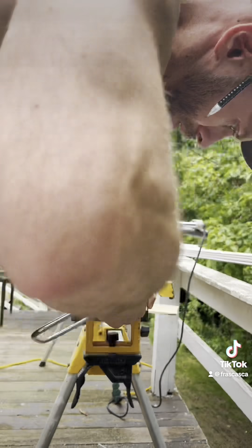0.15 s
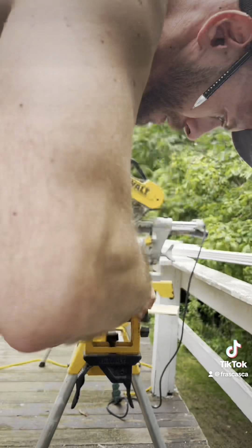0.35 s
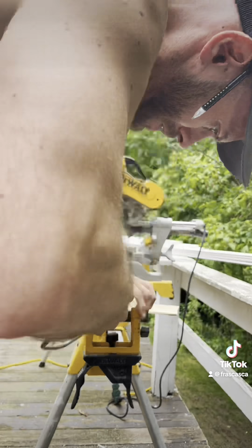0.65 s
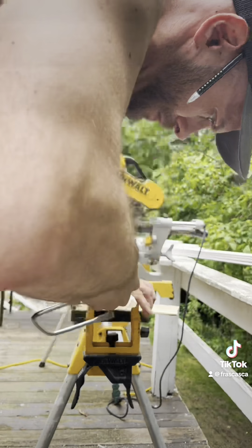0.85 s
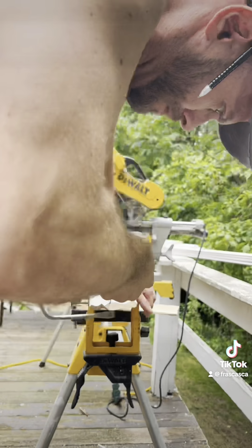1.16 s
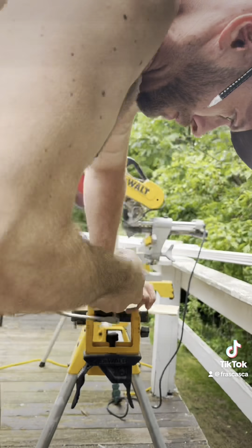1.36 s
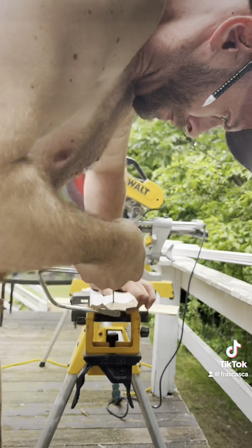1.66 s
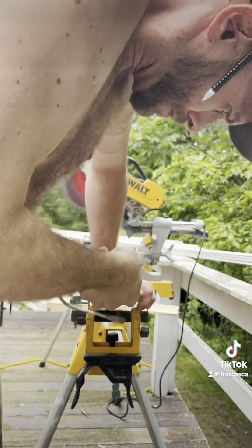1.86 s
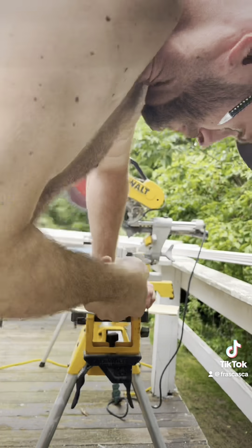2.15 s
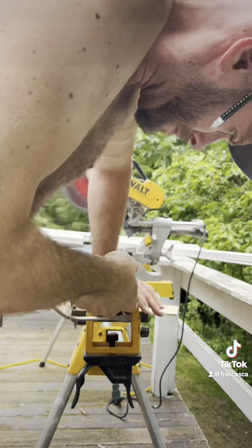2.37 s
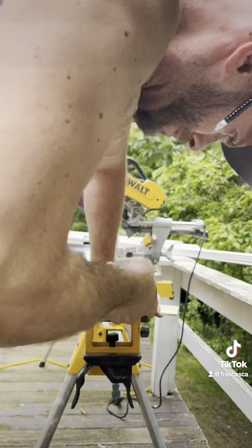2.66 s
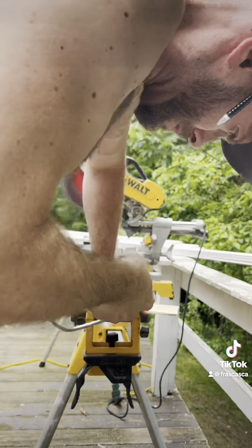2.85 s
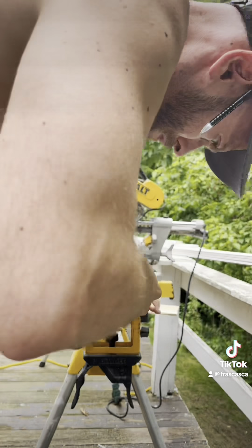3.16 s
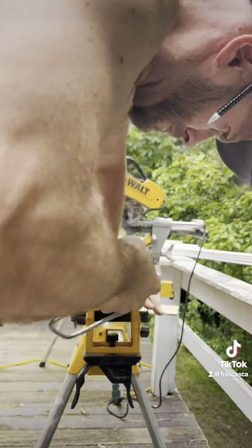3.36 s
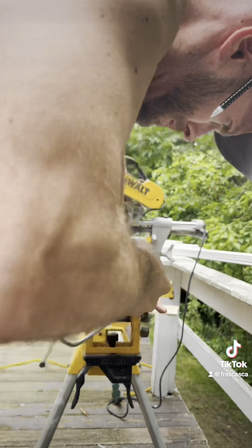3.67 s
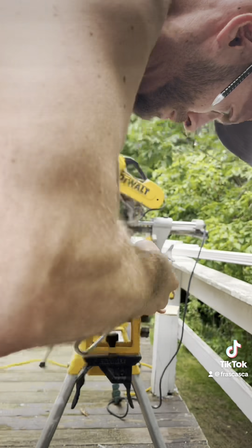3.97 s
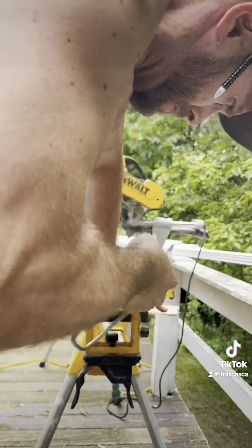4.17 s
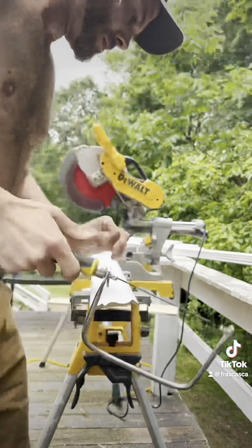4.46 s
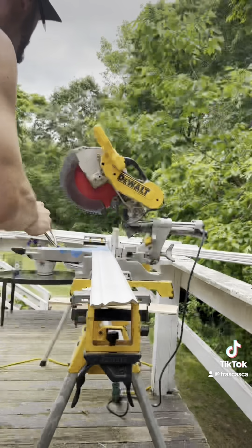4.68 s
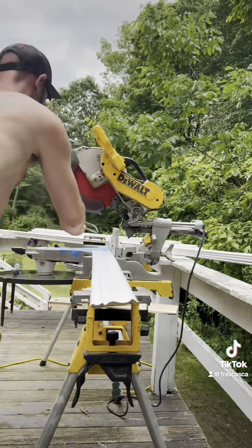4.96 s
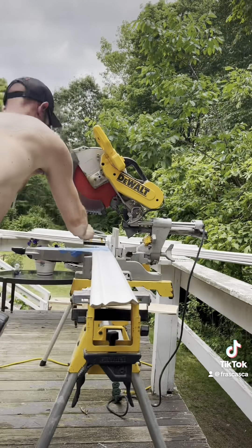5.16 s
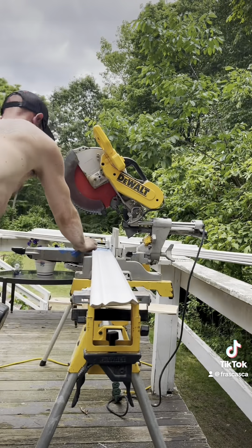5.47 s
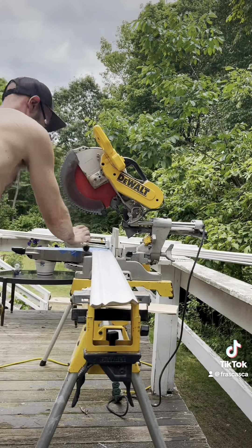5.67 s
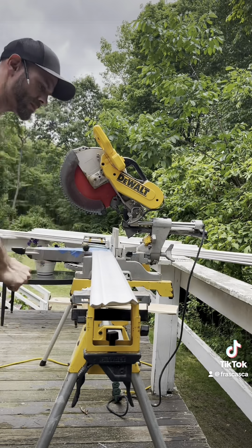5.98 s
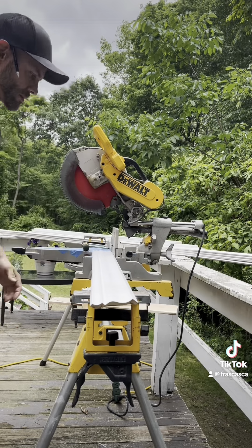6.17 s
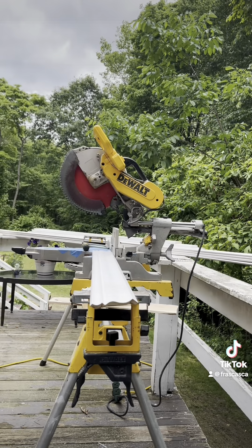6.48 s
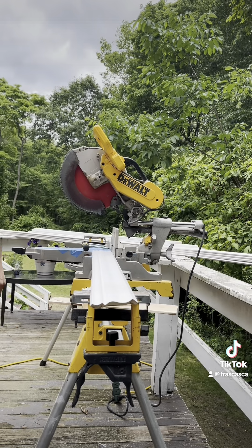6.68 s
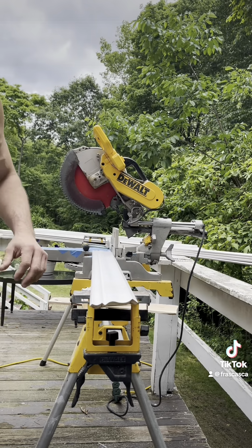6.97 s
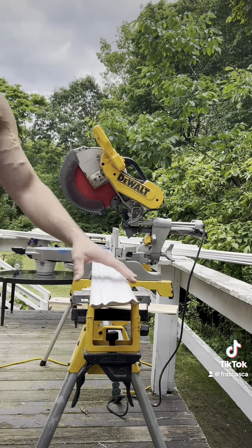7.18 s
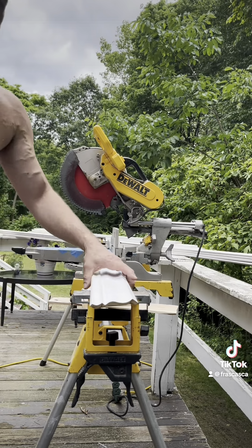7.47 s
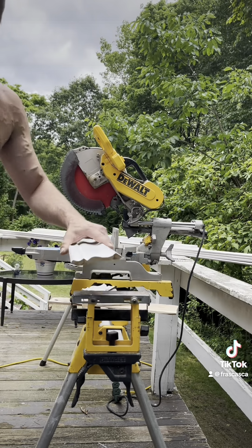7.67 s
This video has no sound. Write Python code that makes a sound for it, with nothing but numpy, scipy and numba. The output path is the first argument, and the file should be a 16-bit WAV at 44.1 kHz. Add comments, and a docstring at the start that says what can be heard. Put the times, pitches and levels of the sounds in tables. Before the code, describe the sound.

Very quick back-and-forth sawing fills the first half: dry, woody rasps at about fifteen strokes a second, squealing slightly midway, faltering, then returning louder. After it ends, deck planks boom and knock under steps, a steel-framed saw drops and rattles, and hands brush the stand. Quiet far rumble and leaf rustle remain, with buzzy birdsong rising at the end. Near microphone outdoors, wide stereo, little echo.

```python
"""A coping saw rasps in very quick strokes through a molding clamped on a steel stand on a wooden deck.
Its teeth are dense random clicks that ring the wood, the stand and the blade; some snag, some squeal.
The worker drops the saw (a bouncing rattle) and steps back over boards that knock, boom and tremble.
Birds whistle and trill in the trees around, over coloured noise for far traffic, wind and rustling.
All is heard close by, in two channels; railing and house wall give short reflections."""
import sys
import numpy as np
from scipy import signal
from scipy.fft import rfft, irfft, next_fast_len
from scipy.io import wavfile
from scipy.ndimage import uniform_filter1d
from numba import njit

SR = 44100
rng = np.random.default_rng(int(sys.argv[2]) if len(sys.argv) > 2 else 0)


def log_audio(samples):
    """Write samples as a 16-bit WAV file to the path given in sys.argv[1]."""
    # one column per channel
    frames = np.atleast_2d(samples).T
    # limit to full scale, then quantise
    limited = np.clip(frames, -1, 1)
    pcm = np.round(limited * 32767).astype(np.int16)
    wavfile.write(sys.argv[1], SR, pcm)


N = 345303  # length in samples


def undb(db):
    """Turn a level in dB into a gain."""
    return 10 ** (np.asarray(db) / 20)


def unit(x):
    """Scale to rms 1."""
    return x / np.sqrt(np.mean(x ** 2))


def band_pass(x, low_hz, high_hz, order=2):
    """Keep only what lies between two frequencies."""
    return signal.sosfilt(signal.butter(order, [low_hz, high_hz], "band", fs=SR, output="sos"), x)


@njit
def moving_band(x, hz, width):
    """State-variable band-pass whose centre moves, with gain 1 at the centre."""
    y, band, low = np.empty(len(x)), 0., 0.
    for i in range(len(x)):
        g, k = np.tan(np.pi * hz[i] / SR), width / hz[i]
        v = (band + g * (x[i] - low)) / (1 + g * (g + k))
        band, low, y[i] = 2 * v - band, low + 2 * g * v, k * v
    return y


def resonate(x, peaks):
    """Sum of (Hz, width, dB) resonances with alternating sign."""
    out = 0
    for k, (hz, width, db) in enumerate(peaks):
        peak = signal.lfilter(*signal.iirpeak(hz, hz / width, SR), x)
        out = out + (-1) ** k * undb(db) * peak / np.sqrt(width)
    return out


def ring(x, modes):
    """Sum of (Hz, dB, t60) modes struck by x; t60 is the time to fade by 60 dB."""
    out = 0
    for hz, db, t60 in modes:
        pole = np.exp((2j * np.pi * hz - np.log(1000) / t60) / SR)
        out = out + undb(db) * signal.lfilter([1], [1, -pole], x).imag
    return out


def on_log_hz(table, n):
    """Values of a (Hz, value) table at the bins of an n-point spectrum."""
    hz, value = np.transpose(table)
    return np.interp(np.log(np.arange(n // 2 + 1) * SR / n + 1), np.log(hz + 1), value)


def colour(x, table):
    """Shape the spectrum of x by a (Hz, dB) table."""
    n = next_fast_len(len(x))
    return irfft(rfft(x, n) * undb(on_log_hz(table, n)), n)[:len(x)]


def swells(s, ms, db, rise=1.25, fall=.95):
    """Envelope of flat-topped swells; rise and fall stretch the two halves of each; powers add."""
    power = np.zeros(N)
    for t0, width, gain in zip(s, np.asarray(ms) / 1000, undb(db)):
        i = np.arange(max(int((t0 - 2 * width) * SR), 0), min(int((t0 + 2 * width) * SR), N))
        t = i / SR - t0
        bump = 2. ** -np.abs(2 * t / width / np.where(t < 0, rise, fall)) ** 2.5
        power[i] += (gain * bump) ** 2
    return np.sqrt(power)


def clicks(rate, scatter_db):
    """Random clicks, rate a second on average, a few much stronger than the rest."""
    hit = rng.random(N) < rate / SR
    return unit(hit * rng.standard_normal(N) * undb(scatter_db * rng.exponential(size=N)))


def walk(rate):
    """Random levels held 1 / rate s and smoothed twice; spread near 1."""
    k = int(SR / rate)
    held = np.repeat(rng.standard_normal(N // k + 1), k)
    return 0.83 * uniform_filter1d(uniform_filter1d(held, k), k)[:N]


# cutting strokes: (peak time [s], relative wood level [dB], length before rise and fall shares [ms])
STROKES = [(0.019, -43.5, 27), (0.107, -35.5, 23), (0.194, -37, 30), (0.277, -33.5, 25), (0.358, -35, 31),
           (0.423, -34, 29), (0.488, -38, 32), (0.566, -47, 31), (.62, -38, 29), (.692, -34, 29),
           (0.75, -35, 19), (0.813, -40, 25), (0.88, -32.5, 23.3), (0.946, -35.5, 34), (1.009, -35.5, 24),
           (1.075, -34.5, 26), (1.143, -34.5, 20), (1.21, -35.5, 28), (1.275, -34.5, 33), (1.342, -38, 28),
           (1.408, -41, 21), (1.465, -38.5, 21), (1.531, -45, 41), (1.599, -42.5, 34), (1.653, -39.5, 11),
           (1.716, -38.5, 13), (1.777, -40.5, 12), (1.84, -42.5, 26), (1.916, -40, 39), (1.987, -38, 22),
           (2.047, -46, 25), (2.113, -49.5, 35), (2.176, -38, 21), (2.265, -42, 20), (2.327, -45, 27),
           (2.39, -44, 27), (2.45, -39.5, 28), (2.513, -36, 25), (2.576, -37, 13), (2.635, -41, 24),
           (2.701, -41.5, 28), (2.759, -37.5, 26), (2.817, -39, 12.4), (2.881, -38.5, 50),
           (2.947, -35.5, 36), (3.011, -41, 32), (3.09, -52, 11), (3.137, -49, 17), (3.216, -51, 5.6),
           (3.26, -51, 12), (3.362, -43, 56), (3.417, -46, 67), (3.484, -37.5, 23), (3.554, -37.5, 30),
           (3.608, -32.5, 12), (3.678, -38, 23), (3.734, -31, 19), (3.799, -30.5, 28), (3.86, -35.5, 30),
           (3.919, -27, 21.4), (3.99, -34.5, 43), (4.047, -28.5, 34.6), (4.107, -30.5, 32),
           (4.169, -30.5, 25), (4.226, -31, 28.4), (4.29, -30.5, 33.5), (4.349, -32, 22),
           (4.433, -39, 19.5)]
# blade dragging between strokes:
# (time [s], relative wood level [dB], stand minus wood level [dB], blade minus wood level [dB])
DRAG = [(0, -84, 3, 23.5), (.3, -62, -2, -10), (.8, -66.5, -7.5, 9), (1.3, -57.5, -4.5, -3.5),
        (1.9, -56, -3.5, 1), (2.1, -49, -1.5, 0), (2.35, -66.5, -6.5, 7), (2.7, -58, -6, 7),
        (3.0, -60.5, -11.5, -10), (3.2, -62, -5, -4), (3.6, -53.5, -9.5, -2), (4.1, -59, -7.5, -1),
        (4.4, -47.5, -5.5, -9)]
# the cut moves through the profile: (time [s], blade minus wood level of a usual stroke [dB],
# middle pitch of the free end [Hz], way back minus stroke level [dB])
CUT = [(0, -9.5, 655, -18.5), (.75, -6.5, 840, -11.5), (1.3, -6.5, 725, -11.5), (1.6, -0.5, 770, -8),
       (1.95, -5.5, 840, 0), (2.08, 1, 980, -5), (2.22, -3.5, 980, -4), (2.4, 0, 1230, -3.5),
       (2.9, -5, 1310, -4), (3.4, -6, 990, -22), (3.7, -9, 756, -15), (4.3, -5, 810, -22),
       (4.43, 5, 726, -39)]
# resonances of molding, stand and blade: (frequency [Hz], width [Hz], relative level [dB])
WOOD = [(533, 150, 7), (721.4, 35, 10), (830, 370, 3.5), (1630, 130, -8), (1390, 250, 3.5),
        (2050, 2260, 14.5)]
STAND = [(131.8, 23, 1), (222.6, 37.5, 3.5), (394, 61, -1.5)]
BLADE = [(2386, 580, 2.5), (2980, 490, 7), (3680, 270, 3), (4900, 790, 5), (6850, 3900, 2.5),
         (13200, 10600, -1.5)]
STROKE_RISE, STROKE_FALL = 0.8, 0.56  # stretch of a stroke's two halves
BACK_AFTER_S, BACK_MS, BACK_BLADE_DB = 0.032, 21, -1.5  # the duller way back after each stroke
BITE_DB, BLADE_FOLLOWS = -43, 0.62  # usual stroke; share of a stroke's extra dB that reaches the blade


def saw():
    """Teeth catch fibres as dense clicks that ring the wood, the stand and the blade."""
    t = np.arange(N) / SR
    cut_s, cut_db, cut_ms = np.transpose(STROKES)
    cut_at, share_db, end_hz, back_db = np.transpose(CUT)
    share = np.interp(cut_s, cut_at, share_db) - (1 - BLADE_FOLLOWS) * (cut_db - BITE_DB)
    # every stroke forward, then every way back
    s, ms = np.r_[cut_s, cut_s + BACK_AFTER_S], np.r_[cut_ms, BACK_MS + 0 * cut_ms]
    wood_db = np.r_[cut_db, cut_db + np.interp(cut_s, cut_at, back_db)]
    blade_db = np.r_[share, share + BACK_BLADE_DB]
    drag_at, drag_db, stand_db, drag_blade_db = np.transpose(DRAG)
    sawing = np.clip((drag_at[-1] - t) / 0.025, 0, 1)  # 1 while the saw is in use
    teeth, dust = clicks(3000, 1.7), clicks(5000, 2.1)
    catch = undb(1.2 * walk(150))  # the cut grips and slips within a stroke
    dull_ticks, bright_ticks = snags()
    stray = .8 * np.clip(clicks(70, 1.), -25, 25)  # lone teeth tick at random all through the sawing
    # (resonances, clicks, stroke dB, drag dB, ticks, tick dB), stroke and drag dB against the wood
    bodies = ((WOOD, teeth, 0, 0, dull_ticks, -5),
              (STAND, teeth, np.interp(s, drag_at, stand_db), stand_db, dull_ticks, -14),
              (BLADE, dust + .5 * teeth, blade_db, drag_blade_db, bright_ticks, -6))
    out = 0
    for body, excite, stroke_db, body_drag_db, ticks, tick_db in bodies:
        bed = sawing * undb(np.interp(t, drag_at, drag_db + body_drag_db) + 4.7 * walk(40.31))
        strokes = swells(s, ms, wood_db + stroke_db, STROKE_RISE, STROKE_FALL)
        force = np.hypot(strokes, bed) * catch * excite + bed * stray + undb(tick_db) * ticks
        out = out + resonate(force, body) / np.std(resonate(excite[:SR], body))
        if body is WOOD:
            out = 0.49 * out + 0.5 * free_end(force, excite, np.interp(t, cut_at, end_hz))
    # the loop ends on the blade, so its force drives the squeal
    return out + squeal(force, excite) + flanks(dust, sawing) + slap(teeth)


# a tooth snags and lets go with a tick: (time [s], relative level [dB], blade minus wood level [dB])
SNAGS = [(1.387, -30, 1), (1.607, -25, 2.5), (1.899, -32.5, 6.5), (1.919, -19, -4), (2.048, -20, 4.5),
         (2.085, -30, 13), (2.106, -23, -3), (2.126, -18, -21), (2.174, -29, -5), (2.627, -23.5, -2),
         (2.809, -33, 1), (2.867, -28, -9), (2.943, -24.5, -1), (2.987, -33.5, 1), (3.063, -32, 0),
         (3.298, -30, -10), (3.336, -41, -16), (3.409, -26.5, -2), (3.465, -36, 4.5), (3.608, -26, -2),
         (3.729, -22.5, -7), (3.783, -21.5, -4.5), (3.851, -25, -2.5), (3.977, -27.5, 0), (4.033, -24, -11),
         (4.093, -29, -9), (4.332, -30, 6), (4.428, -29.5, 9.5)]


def snags():
    """Each tick is a burst of noise that fades quickly; returns wood and blade versions."""
    s, tick_db, bright_db = np.transpose(SNAGS)
    ticks = np.zeros((2, N))
    ticks[:, (s * SR).astype(int)] = undb([tick_db, tick_db + bright_db])
    fade_ms = 1.97  # time to fall to about a third
    return signal.lfilter([1], [1, -np.exp(-1000 / fade_ms / SR)], ticks) * rng.standard_normal(N)


def free_end(force, excite, hz):
    """The molding's free end changes its pitch as the cut moves and the grip shifts."""
    place = hz * 2 ** (0.56 * walk(10))
    return moving_band(force, place, 422.0) / np.std(moving_band(excite[:SR], place, 266.0))


# the blade squeals where the cut pinches it:
# (time [s], pitch [Hz], level against the blade's driving clicks [dB])
SQUEAL = [(1.6, 3260, -28), (1.8, 3470, -6), (1.95, 3620, -15), (2.05, 5250, -45), (2.25, 4180, -15),
          (2.45, 3840, -12), (2.9, 3570, -5), (3.05, 3600, -34)]
SQUEAL_WIDTH_HZ = 280.


def squeal(force, excite):
    """A narrow resonance of gliding pitch, driven by the force on the blade."""
    at, hz, db = np.transpose(SQUEAL)
    t = np.arange(N) / SR
    pitch = np.interp(t, at, hz)
    usual = np.std(moving_band(excite[:SR], pitch, SQUEAL_WIDTH_HZ))
    return undb(np.interp(t, at, db)) * moving_band(force, pitch, SQUEAL_WIDTH_HZ) / usual


def flanks(dust, sawing):
    """The blade's flanks rub in the slot: a fine hiss of band-passed clicks, wavering a little."""
    return sawing * undb(-76.5 + 1.5 * walk(6.0)) * unit(band_pass(dust, 5500, 14500))


# the molding slaps the stand: (time [s], peak level of the slap [dB], pitch [Hz], 60 dB fade [s])
KNOCK = (.112, -25, 490, .025)


def slap(teeth):
    """A short falling tone rings one mode, and the boards below answer with a thud."""
    s, db, hz, t60 = KNOCK
    after = np.arange(N) / SR - s
    push = swells([s], [20], [0])
    # the slap drops in pitch as the board settles
    tone = ring(push * np.sin(2 * np.pi * hz * after * (1 - 4 * after)), [(hz, 0, t60)])
    thud = ring(push * teeth, PLANK)
    return undb(db) * (tone / np.abs(tone).max() + .5 * thud / np.abs(thud).max())


# the saw lands and bounces: (time [s], relative steel level [dB], wood thump minus steel level [dB])
DROP = [(5.3137, -20.5, -6), (5.328, -28, -0.5), (5.35, -29.5, 10), (5.363, -36.5, 13),
        (5.385, -50.5, 18.5)]
# ringing of wood and of steel: (frequency [Hz], relative level [dB], 60 dB fade [s])
THUMP = [(438, -8, 0.11), (462.6, -3.5, 0.17), (620, -3, 0.14), (666, -1, 0.074), (956, -6.5, .1),
         (1071, -1, 0.061), (1200, -6.5, 0.027), (1295, 0.5, 0.071)]
STEEL = [(2830, 7, 0.12), (3320, -6, 0.092), (3504, -2, .12), (3680, -3.5, 0.12), (4905, -3, 0.087),
         (7320, -0.5, .04), (7700, -5, 0.084), (10600, -18, 0.042)]
# the saw's steel bow sings on: (frequency [Hz], peak level [dB], 60 dB fade [s])
BOW = [(1475, -47, 1.5), (2945, -43, .8), (3500, -49, .8)]
# tone colour of the clatter: (frequency [Hz], relative level per Hz [dB])
CLATTER = [(180, -43), (300, -10), (624, -4), (2650, -10), (3460, -5), (5900, -12), (7440, -12.5),
           (13300, -20.5), (16000, -24)]
BOUNCE_MS = 8.8  # before the rise and fall stretch
SHIVER_DB, SHIVER_T60_S = -32, 0.26  # loose parts of the stand rattle on; relative level, 60 dB fade


def drop():
    """Bounces of the saw: a rattle of contacts into steel frame and wood."""
    s, db, thump_db = np.transpose(DROP)
    start = int((s[0] - .1) * SR)
    rattle = clicks(20000, .5)[start:]
    ms = BOUNCE_MS + 0 * s
    after = np.arange(start, N) / SR - s[0]
    shiver = (after > 0) * undb(SHIVER_DB - 60 * np.abs(after) / SHIVER_T60_S)
    steel = np.hypot(swells(s, ms, db, rise=0.65, fall=0.94)[start:], shiver) * rattle
    wood = swells(s, ms, db + thump_db, rise=0.34, fall=2.6)[start:] * rattle
    crack = colour(steel, CLATTER) / np.std(colour(rattle, CLATTER))
    landing = 1. * (np.arange(start, N) == int(s[0] * SR))  # a single click
    rung = undb(-29.0) * ring(steel, STEEL) + ring(landing, BOW) + undb(-31.5) * ring(wood, THUMP)
    return np.r_[np.zeros(start), undb(9) * crack + rung]


# footfalls and handling knocks carried by the boards:
# (time [s], boom peak level [dB], knock minus boom peak level [dB], contact time scale [ms])
STEPS = [(4.474, -39, 10, 20), (4.535, -40, 1, 4.7), (4.581, -27.5, -5.5, 36), (4.604, -27, -38, 4.4),
         (4.771, -26.5, -1, 29), (4.858, -25, -12, 13), (5.079, -22, -9.5, 76), (5.13, -19, -17, 23),
         (5.181, -29.5, -35, 10), (5.209, -30, -21, 9.7), (5.253, -33.5, -7, 11), (5.4, -30, -0.5, 11),
         (5.49, -29, -21.5, 22), (5.784, -27, -2.5, 20), (6.236, -36, -6, 20), (6.36, -39, 0.5, 9.3),
         (6.632, -26.5, 1.5, 23), (6.695, -44, 1, 27), (6.727, -41, -16, 12), (7.585, -35.5, -1.5, 8.8)]
# boom of the deck, then knock of a plank: (frequency [Hz], relative level [dB], 60 dB fade [s])
BOARDS = [(57.5, -25, 0.053), (107, -3, 0.076), (151.4, -4, 0.035)]
PLANK = [(214, -2.5, 0.029), (296, 3.5, 0.079), (343, 1, 0.065), (500, -7, 0.028), (767, -13, 0.079)]
# the boards tremble on: start against the boom, 60 dB fade, level at rest before its waver
TREMBLE_DB, TREMBLE_T60_S, REST_DB = -15.5, 1.02, -58


def deck():
    """Each footfall or handling knock strikes a plank at once; the deck's boom builds up after it."""
    s, db, knock_db, ms = np.transpose(STEPS)
    out, shaken = np.zeros(N), np.zeros(N)
    shape = rng.standard_normal((len(s), 2, 8192))
    t = np.arange(8192) / SR
    for k in range(len(s)):
        push = t / (ms[k] / 1000)
        boom = ring(shape[k, 0] * push * np.exp(-2.5 * push), BOARDS)
        # smoothing softens the contact
        contact = uniform_filter1d(shape[k, 1], size=24) * push * np.exp(-5. * push)
        knock = ring(contact, PLANK)
        both = boom / np.abs(boom).max() + undb(knock_db[k]) * knock / np.abs(knock).max()
        i = int(s[k] * SR)
        out[i:i + 8192] += (undb(db[k]) * both)[:N - i]
        shaken[i] = undb(db[k] + TREMBLE_DB) ** 2
    # shaking is a power, so it fades at twice the dB rate of undb
    shaken = signal.lfilter([1], [1, -undb(-2 * 60 / TREMBLE_T60_S / SR)], shaken)
    tremble = np.sqrt(shaken + undb(REST_DB) ** 2) * undb(5.1 * walk(12))
    return out + tremble * unit(ring(rng.standard_normal(N), BOARDS))


# hands and tools brushing the stand: (peak time [s], level [dB], length before rise and fall
# stretch [ms], low edge [Hz], high edge [Hz])
TOUCHES = [(4.581, -48.5, 7.8, 480, 4400), (4.923, -48, 2.7, 2830, 9000), (4.925, -49, 7.3, 1770, 2300),
           (4.941, -49, 6, 1800, 2100), (4.942, -62, 3.4, 3000, 9000), (5.092, -43, 2.3, 4300, 14000),
           (5.092, -44, 14, 487, 5450), (6.358, -46.5, 13, 300, 2600), (6.367, -54, 5, 2500, 12000),
           (6.543, -41.5, 5.4, 200, 1260), (6.544, -53, 20, 500, 5100), (6.64, -51, 8.8, 706, 3580),
           (7.265, -62.5, 43, 1225, 2050), (7.441, -60, 45, 199, 2520), (7.587, -47.5, 40, 200, 2570),
           (7.592, -56.5, 27, 1800, 2170)]


def touches():
    """Short gritty brushes: random clicks, each brush within its own band."""
    out, grit = np.zeros(N), clicks(9000, 1.2)
    for s, db, ms, low_hz, high_hz in TOUCHES:
        i = slice(int((s - .1) * SR), int((s + 0.063) * SR))
        band = band_pass(grit[i], low_hz, high_hz)
        out[i] += swells([s], [ms], [db], rise=0.21, fall=1.4)[i] * unit(band)
    return out


# bird whistles: (start [s], end [s], start pitch [Hz], end pitch [Hz], level [dB], waver [Hz])
WHISTLES = [(6.036, 6.174, 3980, 3990, -57, 25.3), (6.19, 6.257, 3930, 4050, -61.5, 30.2)]
# buzzy trills in the trees: (start [s], end [s], centre [Hz], width [Hz], level [dB])
TRILLS = [(5.502, 5.892, 3350, 402, -70.5), (6.384, 6.885, 7070, 1620, -63.5),
          (6.856, 7.078, 3230, 610, -65.5), (7.03, 7.456, 5300, 2270, -59),
          (7.219, 7.318, 3270, 700, -56.5), (7.29, 7.43, 3500, 500, -62.5), (6.3, 6.498, 3900, 400, -68),
          (7.342, 7.598, 7700, 700, -76), (7.405, 7.603, 4900, 1514, -54), (7.5, 7.98, 5030, 2300, -54.5),
          (7.23, 7.274, 3465, 217, -51.5)]


def birds():
    """Near-sine whistles that waver, and bands of noise for trills too quick to resolve."""
    out, waver, drift, noise = np.zeros(N), walk(90), walk(12), rng.standard_normal(N)
    for t0, t1, from_hz, to_hz, db, waver_hz in WHISTLES:
        i = np.arange(int(t0 * SR), int(t1 * SR))
        hz = np.linspace(from_hz, to_hz, len(i)) + waver_hz * waver[i]
        level = undb(db + 1.5 * waver[i[::-1]]) * signal.windows.tukey(len(i), .6)
        out[i] += level * np.sin(2 * np.pi * np.cumsum(hz) / SR)
    for t0, t1, hz, width_hz, db in TRILLS:
        i = np.arange(int(t0 * SR), min(int(t1 * SR), N))
        band = band_pass(np.roll(noise, i[0])[i], hz - width_hz / 2, hz + width_hz / 2, order=5)
        # a stronger strand wanders inside the band
        strand_hz = hz + 0.35 * width_hz * np.roll(drift, i[0])[i]
        band = band + moving_band(band, strand_hz, width_hz / 4)
        fade = signal.windows.tukey(int((t1 - t0) * SR) + 2, .5)[:len(i)]
        out[i] += undb(db + 1.8 * np.roll(waver, i[0])[i]) * fade * unit(band)
    return out


# phase of left against right channel: (frequency [Hz], phase [rad])
STEREO_PHASE = [(0, 0), (1800, .4), (2800, 2.7), (3960, 1.1), (6100, 3.2), (8200, 6.3), (10200, 9.4),
                (12400, 12.5), (15200, 15.8)]
# loudness between the channels: (frequency [Hz], left minus right level [dB])
STEREO_BALANCE = [(60, -.5), (400, -2.5), (1300, -.5), (8000, 1)]


def stereo(x):
    """Give the two channels a set phase and balance."""
    n = next_fast_len(N)
    half = np.exp(.5j * on_log_hz(STEREO_PHASE, n)) * undb(on_log_hz(STEREO_BALANCE, n) / 2)
    spectrum = rfft(x, n)
    return np.array([irfft(spectrum * half, n)[:N], irfft(spectrum / half, n)[:N]])


def echoes(shape, t60_s, db):
    """Noise responses that set in quickly and fade; the last axis is time."""
    t = np.arange(shape[-1]) / SR
    fade = undb(db - 60 * t / t60_s) * np.clip(t / 0.001, 0, 1) / np.sqrt(t60_s * SR / 10)
    return band_pass(rng.standard_normal(shape) * fade, 250, 14000)


# 60 dB fade and relative level of the echoes
YARD_T60_S, YARD_DB = 0.082, -2.5
TREES_T60_S, TREES_DB = .8, -20
SHIFT_S = .06  # hands, saw and body move, so the near reflections change this often


def yard(x):
    """Quick, changing echoes of railing and wall, a faint long tail of trees; channels unrelated."""
    hop = int(SHIFT_S * SR)
    starts = np.arange(0, N, hop)
    padded = np.r_[np.zeros(hop), x, np.zeros(2 * hop)]
    window = np.sin(np.pi * np.arange(2 * hop) / (2 * hop))
    # overlapping pieces, each with its own fresh echoes
    pieces = padded[starts[:, None] + np.arange(2 * hop)] * window
    responses = echoes((len(starts), 2, 6000), YARD_T60_S, YARD_DB)
    near = signal.fftconvolve(pieces[:, None], responses, axes=2)
    out = np.zeros((2, N + SR))
    for i, piece in zip(starts, near):
        out[:, i:i + piece.shape[1]] += piece
    tail = signal.fftconvolve(x[None], echoes((2, SR), TREES_T60_S, TREES_DB))[:, :N]
    return out[:, hop:hop + N] + tail


def spread(table, corner_hz):
    """Coloured noise in both channels, alike in the bass and unrelated above."""
    mid = colour(rng.standard_normal(N), table)
    high_pass = signal.butter(1, corner_hz, "high", fs=SR, output="sos")
    side = signal.sosfilt(high_pass, colour(rng.standard_normal(N), table))
    return (mid + side * np.array([[1], [-1]])) / np.std(mid)


# rustle of clothes and leaves, before its waver: (time [s], level [dB])
RUSTLE = [(4.45, -59.5), (5.0, -59.5), (5.6, -61.5), (6.299, -68), (6.45, -60.5), (6.75, -58), (7.0, -62.5),
          (7.199, -70.5), (7.83, -65.5)]
# level of the far rumble, before its waver: (time [s], level [dB])
AIR_LEVEL = [(0, -52.5), (.8, -58.5), (2.5, -55.5), (3.2, -62), (4.2, -60), (6.8, -56.5), (7.2, -56),
             (7.83, -53.5)]
# tone colours of rustle and rumble: (frequency [Hz], relative level per Hz [dB])
RUSTLE_COLOUR = [(120, -27), (300, -1.5), (860, -5), (1600, -15), (3400, -14.5), (7500, -28),
                 (12500, -35.5), (16000, -42)]
AIR = [(24, -34.5), (40, 3.5), (101, -5.5), (269, -17), (345, -15.5), (529, -40), (852, -39), (1630, -49),
       (2910, -34.5), (3470, -27.5), (7540, -51), (16000, -80.5)]


def air():
    """Far traffic and wind in the trees, with a nearer rustle; both are noise that swells and fades."""
    t = np.arange(N) / SR
    at, db = np.transpose(RUSTLE)
    rustle_gain = undb(np.interp(t, at, db) + 4.6 * walk(25))
    close = stereo(unit(colour(rng.standard_normal(N), RUSTLE_COLOUR)))
    rustle = rustle_gain * (close + undb(-3.5) * spread(RUSTLE_COLOUR, 500))
    at, db = np.transpose(AIR_LEVEL)
    return undb(np.interp(t, at, db) + 1.4 * walk(2.5)) * spread(AIR, 500) + rustle


TOP_NOISE_DB = -87


def top_noise():
    """A faint narrow band of steady noise lies near 12.7 kHz."""
    return undb(TOP_NOISE_DB) * unit(resonate(rng.standard_normal((2, N)), [(12700, 1600, 0)]))


def scene():
    """Everything but the air reaches both channels directly and again from the yard."""
    near = saw() + drop() + deck() + touches() + birds()
    return stereo(near) + yard(near) + air()


def record(dry):
    """Add the faint top noise, thin the deepest bass, round the peaks and cut the top."""
    high_pass = signal.butter(2, 45, "high", fs=SR, output="sos")
    thin = signal.sosfilt(high_pass, dry + top_noise())
    rounded = .8 * np.tanh(thin / .8)
    return signal.sosfilt(signal.ellip(8, .2, 70, 15900, fs=SR, output="sos"), rounded)


dry = scene()
out = record(dry)
log_audio(out)
```